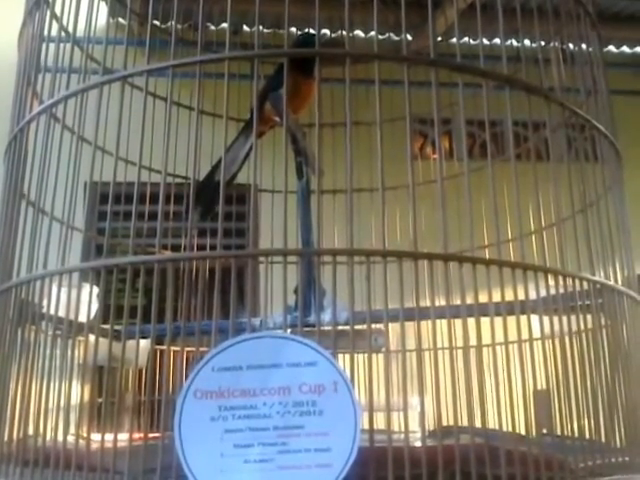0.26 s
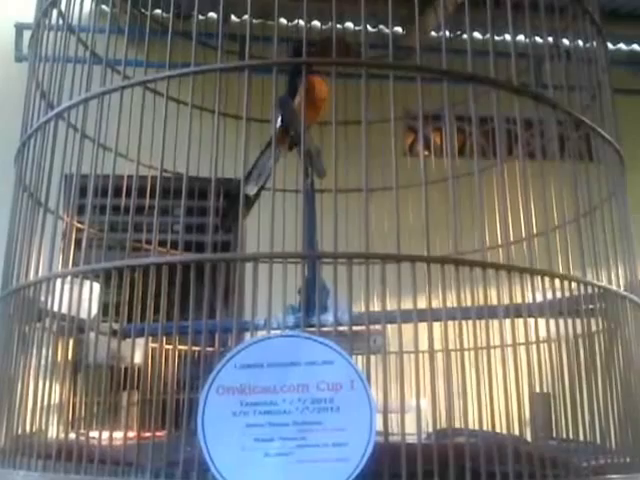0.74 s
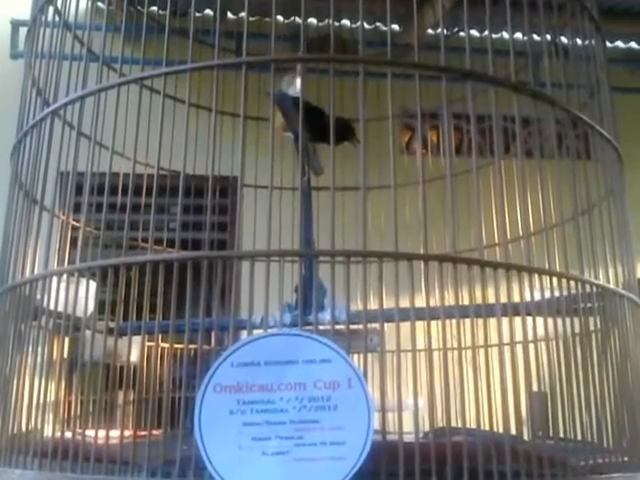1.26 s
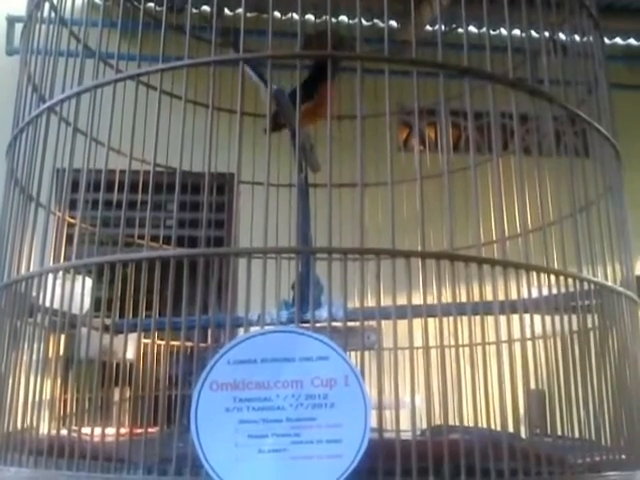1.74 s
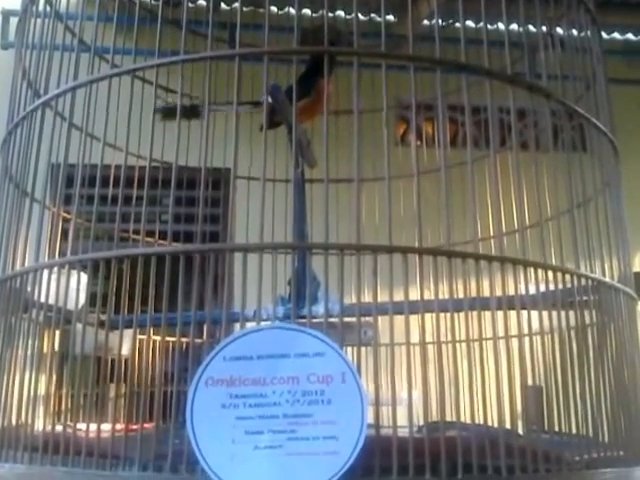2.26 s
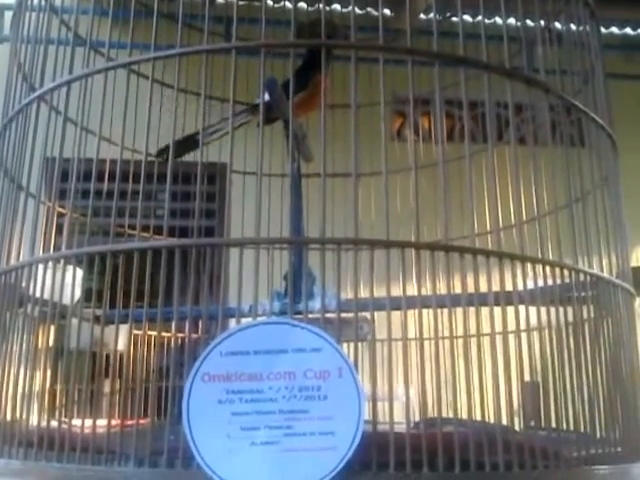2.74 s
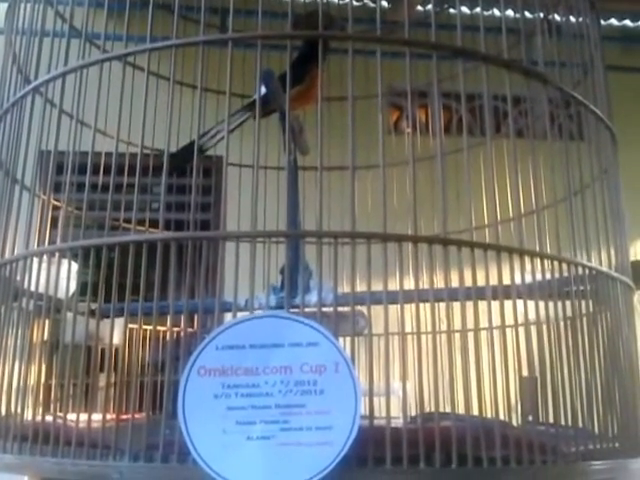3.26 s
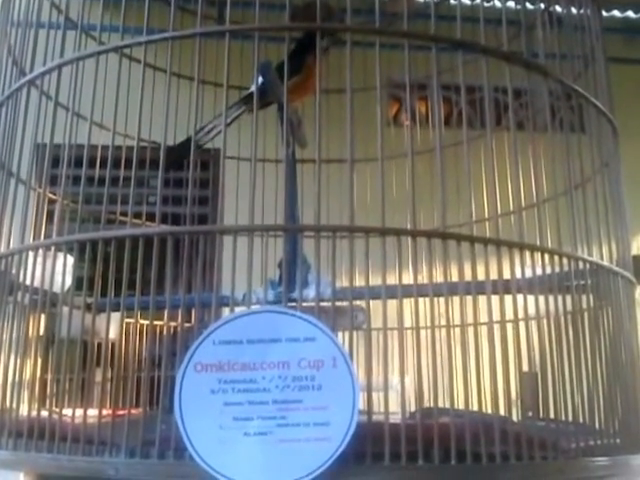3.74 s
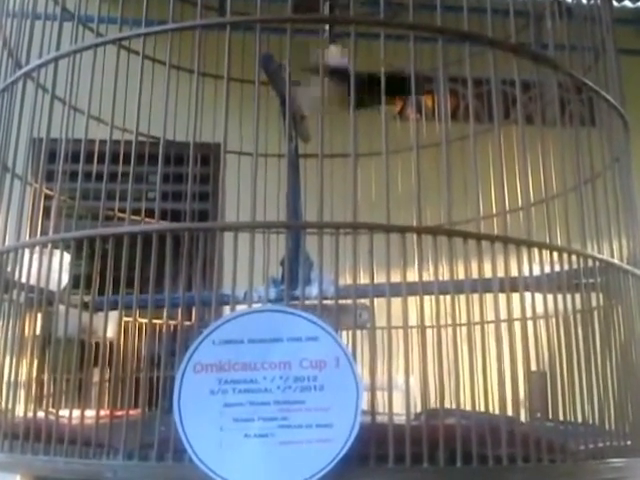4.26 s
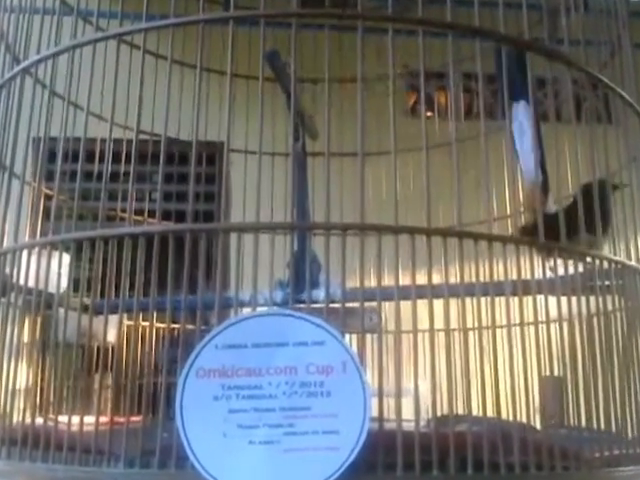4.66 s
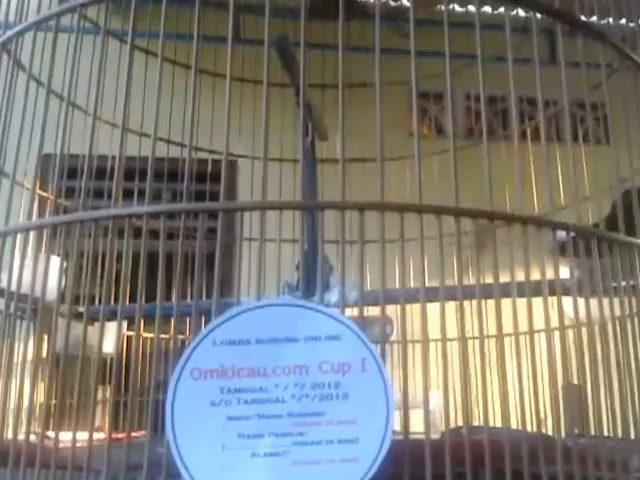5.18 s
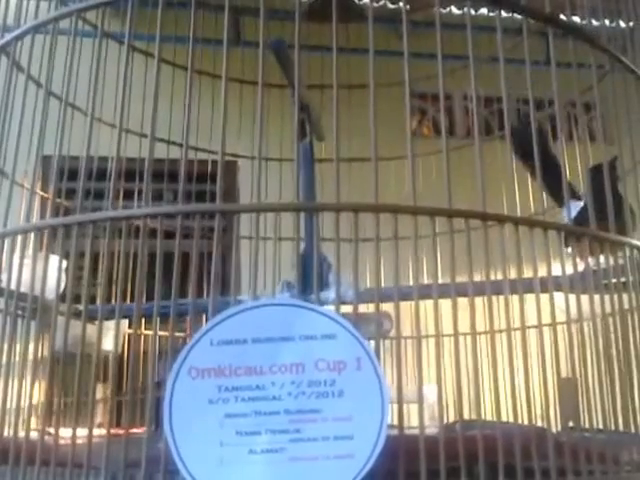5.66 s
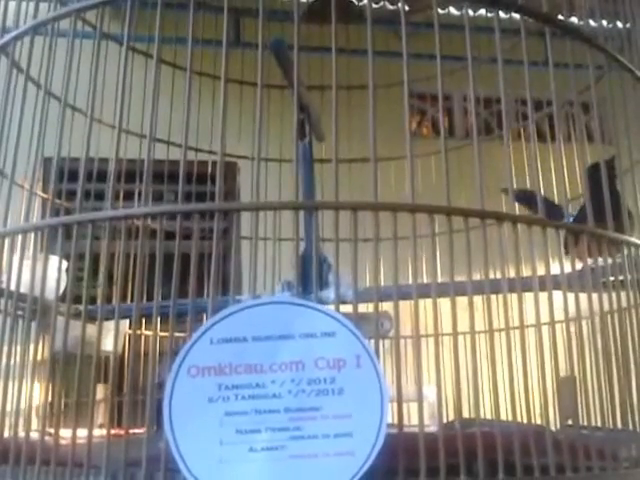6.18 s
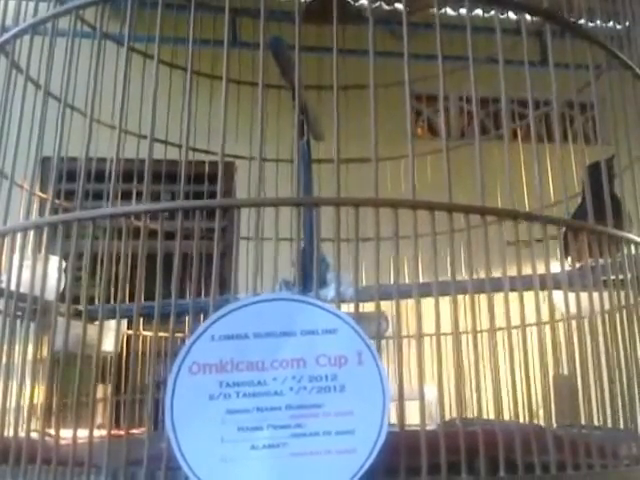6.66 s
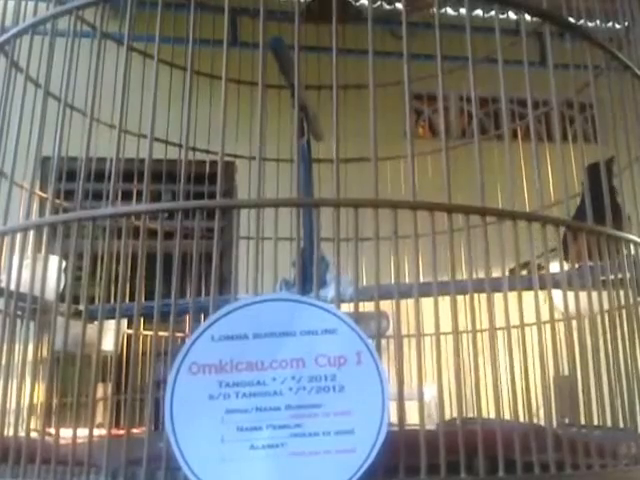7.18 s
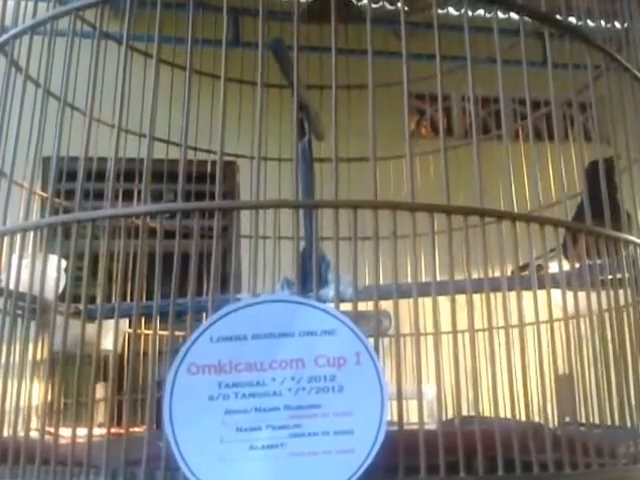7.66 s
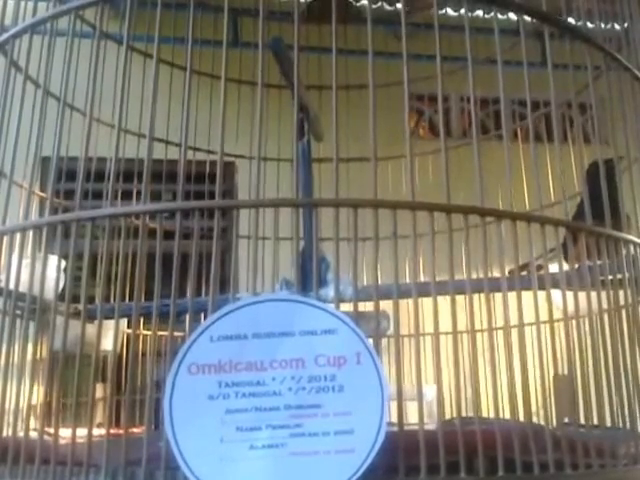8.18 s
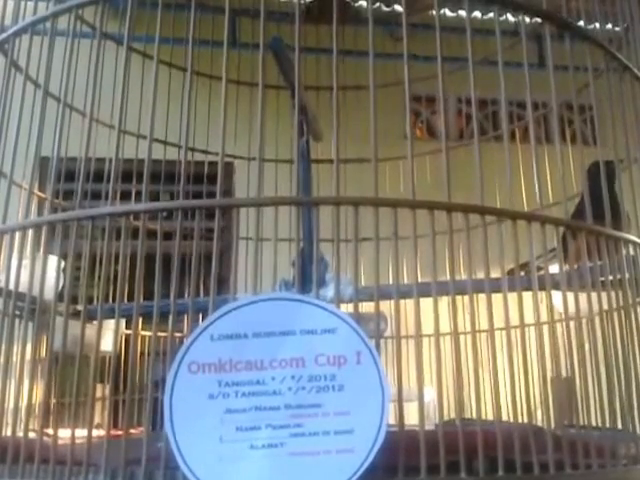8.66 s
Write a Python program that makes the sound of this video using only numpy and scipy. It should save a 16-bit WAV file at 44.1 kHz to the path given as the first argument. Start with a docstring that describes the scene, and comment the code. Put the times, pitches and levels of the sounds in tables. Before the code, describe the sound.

A caged songbird close by sings slurred whistles, quickening upsweeps, harsh chacks and piercing dives on a ringing porch, with a faint engine fading behind.

```python
"""A caged shama sings on a hard-walled porch, close by: gliding oscillators make its slurred whistles,
quickening upsweeps, reedy squeals, piercing dives and harsh chacks, with overtones shaped by the beak.
Random reflections and a decaying diffuse tail make the walls ring. A distant engine hums as a sum of orders
and fades, a far horn sounds once as a few partials, another bird chirps far off,
feathers rustle and the street murmurs as coloured noise."""
import sys
import numpy as np
from scipy import signal
from scipy.fft import rfft, irfft, next_fast_len
from scipy.io import wavfile
from scipy.ndimage import uniform_filter1d, map_coordinates

SR = 44100
rng = np.random.default_rng(int(sys.argv[2]) if len(sys.argv) > 2 else 0)


def file_out(sig):
    """Save sig as 16-bit WAV at sys.argv[1]."""
    # one column per channel
    cols = np.atleast_2d(sig).T
    # limit, then scale
    lim = np.clip(cols, -1, 1)
    pcm = np.round(lim * 32767).astype(np.int16)
    wavfile.write(sys.argv[1], SR, pcm)


N = 393372
TIME = np.arange(N) / SR  # seconds
U = np.linspace(0, 1, 400)  # progress through a note
TOP_HZ = 15750  # upper band limit

# All levels and gains in the tables are relative.
# Overtone strength as throat and beak pass it. Each row: frequency in Hz, gain in dB.
BEAK_RESPONSE = [(1900, -23.5), (2900, -29.5), (3800, -28.5), (5000, -30.5), (6300, -34.5), (7700, -33),
                 (8900, -26), (10100, -19), (11400, -33.5), (13600, -29.5), (15500, -43.5)]
# Decay of the diffuse sound of the porch. Each row: frequency in Hz, time to fall 60 dB in seconds.
PORCH_DECAY = [(1100, 0.29), (1900, 0.38), (4000, 0.33), (8000, 0.26), (15000, 0.22)]
# Distant engine. Each row: time in seconds, firing rate in Hz, level in dB.
ENGINE_COURSE = [(0, 40.86, -22.5), (.5, 40.1, -25), (.8, 37.86, -33.5), (2.6, 35.95, -43.5),
                 (3.2, 29.43, -45.5), (3.7, 32.82, -37.5), (4.15, 34.32, -32.5), (4.5, 32.06, -37),
                 (4.85, 35.2, -31), (5.0, 33.7, -53), (5.3, 32.1, -58), (5.6, 31, -75.5)]
# Resonances of the exhaust. Each row: frequency in Hz, gain in dB.
EXHAUST_RESPONSE = [(30, -46.5), (62, 14.5), (70, 12), (80, -19), (100, 3), (112, 3.5), (123, -2.5),
                    (131, -14), (240, -15.5), (330, -30)]
# Street loudness. Each row: time in seconds, level in dB.
STREET_LEVEL = [(0.15, -52), (0.44, -50), (0.68, -46), (3.24, -49), (5.21, -43), (5.66, -56), (8.76, -55)]
# Low rumble of the street. Each row: frequency in Hz, density in dB per Hz.
RUMBLE_SPECTRUM = [(20, -8.5), (60, 6), (150, -6), (400, -23.5), (1200, -49)]
# Wash of far traffic. Each row: frequency in Hz, density in dB per Hz.
MURMUR_SPECTRUM = [(500, -3), (1000, -9.5), (2000, -13.5), (4000, -13.5), (7000, -31.5), (15000, -52)]
# Partials of the far horn. Each row: frequency in Hz, level in dB.
HORN_PARTIALS = [(565, -42.5), (850, -52), (1420, -69), (1700, -51), (1980, -52), (3100, -51.5),
                 (4250, -52.5)]
# Turbulence in harsh notes. Each row: frequency in Hz, density in dB per Hz.
FIZZ_SPECTRUM = [(1500, -26.5), (3000, 13), (5000, 2.5), (9000, 1.5), (12000, -10), (15000, -22)]
# Ring of the phrase before. Each row: frequency in Hz, density in dB per Hz.
RING_SPECTRUM = [(900, -21.5), (1350, -7), (1950, 5.5), (2250, -50.5)]
# Loudness of the feathers. Each row: time in seconds, level in dB.
WING_LEVEL = [(4.3, -100), (4.45, -66.5), (4.8, -58.5), (5.0, -44.5), (5.28, -44), (5.4, -100)]
# Rustle of the feathers. Each row: frequency in Hz, density in dB per Hz.
WING_SPECTRUM = [(200, -7), (1500, 7.0), (4500, -1), (7000, -25.0), (15000, -31.5)]

# Reedy squeals, each a stack of partials that start nearly together.
# Each row: start in seconds, length in seconds, top pitch in Hz, end pitch in Hz, level in dB.
SQUEAL_PARTIALS = [(0.573, .013, 5204, 4860, -24), (5.347, 0.064, 5100, 4740, -19),
                   (5.351, .06, 8800, 8370, -19), (5.357, 0.046, 6120, 6620, -27),
                   (5.36, 0.045, 4070, 3760, -30), (5.402, 0.03, 3457, 2933, -29.5),
                   (5.56, 0.047, 3073, 2890, -22), (5.557, 0.044, 6280, 5660, -17),
                   (5.561, 0.032, 8870, 7890, -20), (5.738, 0.037, 5320, 4840, -28),
                   (5.728, 0.044, 8540, 6500, -19)]
# Piercing dives. Each row: start in seconds, length in seconds, first and last pitch in Hz, level in dB.
DIVE_NOTES = [(.582, 0.025, 5080, 2570, -3.5), (0.62, 0.027, 4700, 2490, -5),
              (0.655, 0.035, 4200, 2370, -8), (5.412, 0.083, 6810, 2760, -5), (5.608, .055, 5840, 2325, -7),
              (5.787, 0.051, 5660, 2760, -7.5)]
# A hoarse churr of two rough, sinking voices.
# Each row: start in seconds, length in seconds, first and last pitch in Hz, level in dB.
CHURR_VOICES = [(0.823, .105, 4280, 3194, -16), (0.856, 0.16, 6090, 3893, -25)]
# Whistles that ease onto a pitch. Each row: start in seconds, length in seconds,
# first and last pitch in Hz, level in dB, easing, loudest point from 0 to 1.
WHISTLE_NOTES = [ (0.885, .36, 2734, 1976, -24.5, 3.6, 0.96), (0.958, 0.032, 1150, 1183, -37, 0.35, 0.9),
                 (1.363, .355, 2227, 2692, -9.5, 0.98, 0.45), (1.764, 0.14, 1514, 1984, -12, 3, 1),
                 (3.265, 0.069, 2616, 3134, -5.5, 1.8, 0.3), (5.283, 0.03, 1733, 1547, -21, 0.59, 1),
                 (5.905, .04, 1590, 3554, -10, 5.5, .7), (5.941, .085, 2160, 2706, -9.5, 0.38, .72),
                 (6.005, 0.07, 2690, 3523, -4.5, 2.6, 0.8), (6.071, 0.067, 2248, 2627, -17.5, 0.46, 0.4),
                 (6.11, 0.047, 2834, 2889, -8.5, 1.5, 0.4), (6.154, 0.029, 3050, 3644, -10.5, 1.2, 0.2),
                 (6.748, 0.029, 1760, 1714, -48.5, .3, 0.1)]
# Mellow downslurs. Each row: start in seconds, length in seconds, first and last pitch in Hz, level in dB.
DOWNSLUR_NOTES = [(1.973, 0.11, 2213, 1372, -10.5), (2.131, 0.11, 2433, 1371, -11),
                  (2.293, .113, 2513, 1304, -10.5)]
# Scoops that dip, then climb. Each row: start in seconds, length in seconds,
# first, bottom and last pitch in Hz, level in dB, lowest point from 0 to 1.
SCOOP_NOTES = [(2.46, .152, 2620, 1944, 3538, -12.5, 0.13), (2.695, .154, 1983, 1540, 2810, -14, .27),
               (3.38, .152, 2133, 1505, 2742, -15.5, .33), (8.221, 0.075, 2018, 1831, 2343, -13, .38)]
# Upsweeps, in quickening runs. Each row: start in seconds, length in seconds,
# first and last pitch in Hz, level in dB, steepest point from 0 to 1.
UPSWEEP_NOTES = [ (2.908, .11, 1159, 2172, -13.5, 0.37), (3.051, 0.067, 1111, 2257, -13, 0.47),
                 (3.163, 0.054, 1240, 2330, -10.5, 0.29), (3.629, 0.15, 1090, 2337, -13.5, 0.49),
                 (3.841, 0.054, 1092, 2320, -14, 0.35), (3.952, 0.045, 1034, 2300, -12.5, 0.37),
                 (4.044, 0.046, 1030, 2324, -11.5, 0.41), (4.142, 0.036, 1067, 2360, -11, 0.28),
                 (6.896, 0.11, 845, 1937, -6, 0.79), (7.247, 0.094, 787, 2015, -7, 0.62),
                 (7.472, 0.079, 780, 2080, -8, 0.5), (7.622, 0.062, 787, 2056, -8, 0.52),
                 (7.739, 0.045, 886, 2267, -8.5, 0.44), (7.84, 0.028, 1013, 2254, -10.5, 0.11)]
# A reedy rise, rich in overtones. Each row: start in seconds, length in seconds,
# first and last pitch in Hz, level in dB, easing, loudest point from 0 to 1.
REEDY_RISE_NOTES = [(4.242, .095, 1134, 2622, -12.5, 3.2, 0.6)]
# Harsh chacks, the pitch flicking up and back. Each row: start in seconds, length in seconds,
# top pitch in Hz, level in dB, highest point from 0 to 1.
CHACK_NOTES = [(4.318, .045, 4936, -11, .2), (4.358, 0.051, 4870, -17.5, 0.2),
               (4.382, .045, 4785, -11, .65), (6.253, 0.034, 4815, -8, 1), (6.292, 0.053, 5920, -12, 0.7),
               (6.355, 0.032, 5486, -13.5, 0.6), (6.519, 0.047, 5940, -15.5, .55),
               (6.566, 0.055, 5750, -19, 0)]
# Warbled notes. Each row: start in seconds, length in seconds, first and last pitch in Hz,
# level in dB, easing, warble rate in Hz, warble depth as a share of pitch.
WARBLE_NOTES = [(7.867, .085, 2130, 3003, -11, 0.38, 107.7, .055),
                (8.009, .135, 1682, 1322, -20, 9, 40.9, 0.07)]
# A last piercing whistle: soft, then loud, then tipping into a dive.
# Each row: time in seconds, pitch in Hz, level in dB.
PIERCING_WHISTLE = [(8.785, 5050, -38), (8.798, 5420, -24), (8.855, 5600, -23), (8.863, 5660, -9),
                    (8.902, 5760, -9), (8.925, 4100, -10)]

# a note is loudest as its pitch crosses the tuning of the throat
MELLOW_HZ, MELLOW_DB_PER_OCT = 1887, 12.5
HARSH_HZ, HARSH_DB_PER_OCT = 4480, 27.5
SQUEAL_FROM, SQUEAL_TOP = .88, 0.37  # starting pitch over top pitch; point where the top is reached
PLUNGE = .3  # extra fall as a dive gives out, over the steady fall
SCOOP_CURVE = 1.6  # power law of the pitch on either side of the bottom
SCOOP_WARBLE_HZ, SCOOP_WARBLE = 111.45, 0.072  # rate and final depth of the buzz that grows through a scoop
S_CURVE, KNEE_WIDTH = 0.48, .2  # weight of an upsweep's steep middle; width of that middle
CHACK_FOOT_HZ = 2690  # pitch at the foot of a chack's rise and fall
DROPOUT_S, DROPOUT_LENGTH_S, DROPOUT_DB = 5.337, .016, -18
CEILING = .96


def amp(db):
    """Level law: decibels to amplitude gain."""
    return 10 ** (np.asarray(db) / 20)


def unit(x):
    """Normalization: x at rms 1."""
    return x / np.sqrt(np.mean(x ** 2) + 1e-20)


def along(points, hz):
    """Interpolation on a logarithmic frequency axis, through (Hz, value) points."""
    f, v = np.transpose(points)
    return np.interp(np.log(hz + 1), np.log(f), v)


def curves(rows, t=TIME):
    """Linear interpolation in time: each column after the first, read at the times t."""
    s, *cols = np.transpose(rows)
    return [np.interp(t, np.sort(s), c) for c in cols]


def wobble(rate):
    """Slow random modulation: a smooth curve through random knots, rate of them a second."""
    knots = rng.standard_normal(int(N * rate / SR) + 4)
    return map_coordinates(knots, [TIME * rate])


def filtered(x, response):
    """Linear filtering: the spectrum of x times a response of frequency."""
    m = next_fast_len(N + SR // 2)
    spectrum = rfft(x, m) * response(np.fft.rfftfreq(m, 1 / SR))
    return irfft(spectrum, m)[:N]


def noise(spectrum):
    """Spectral shaping: coloured noise of rms 1."""
    white = rng.standard_normal(N)
    return unit(filtered(white, lambda hz: amp(along(spectrum, hz))))


def lingering_ring(t60=0.41):
    """Exponential decay: the porch still rings from the phrase before."""
    return amp(-23 - 60 * TIME / t60) * noise(RING_SPECTRUM)


def engine(count=10):
    """Harmonic orders through resonances: a far engine slows and picks up again behind its exhaust."""
    hz, db = curves(ENGINE_COURSE)
    phase = 2 * np.pi * np.cumsum(hz * (1 + 0.017 * wobble(13))) / SR
    orders = sum(amp(along(EXHAUST_RESPONSE, k * hz)) * np.sin(k * phase) for k in range(1, count + 1))
    return amp(db - 3.0 + 0.5 * wobble(6.9)) * orders


def street():
    """Broadband noise: an unsteady low rumble and a soft wash of far traffic."""
    db, = curves(STREET_LEVEL)
    rumble = amp(db + 11 + wobble(5.2)) * noise(RUMBLE_SPECTRUM)
    murmur = amp(db + 1.5) * noise(MURMUR_SPECTRUM)
    return rumble + murmur


def syrinx(notes, jitter, jitter_rate, flutter_db, slope_db, flicker_db=4, edge=0.0019, count=9):
    """Self-oscillation: a gliding membrane gives a fundamental, its overtones and its unsteady amplitude."""
    tone, overtones, strain = np.zeros((3, N))
    waver, flutter = wobble(jitter_rate), wobble(jitter_rate)
    for points in notes:
        start, end = points[0][0], points[-1][0]
        span = slice(max(0, int((start - edge) * SR)), int((end + edge) * SR))
        t = TIME[span]
        hz, db = curves(points, t)
        # the faster the glide (octaves a second), the less steady the membrane
        glide = uniform_filter1d(np.abs(np.gradient(np.log2(hz), t)), size=900)
        rough = np.clip(glide / 10, .65, 1)
        hz = hz * (1 + jitter * rough * waver[span])
        phase = 2 * np.pi * np.cumsum(hz) / SR
        from_edge = np.minimum(t - start, end - t) + edge
        gate = np.sin(np.pi / 2 * np.clip(from_edge / (2 * edge), 0, 1)) ** 2
        size = gate * amp(db + flutter_db * flutter[span])
        strain[span] += size * rough
        tone[span] += size * np.sin(phase)
        flicker = rng.standard_normal((count + 1, 64))
        # overtones grow with effort, flicker and sweep across the resonances of the beak
        for k in range(2, count + 1):
            uneven = flicker_db * np.interp((t - start) * 110, np.arange(flicker.shape[1]), flicker[k])
            effort = .3 * (db + 12)
            gain_db = along(BEAK_RESPONSE, k * hz) - slope_db * np.log2(k / 2) + effort + uneven
            overtones[span] += (k * hz < TOP_HZ) * size * amp(gain_db) * np.sin(k * phase)
    return tone, overtones, strain


def far_chirps(starts=(.275, .375, .475)):
    """A pure gliding tone: another bird, far off, repeats one small rising chirp."""
    chirps = [[(s, 3300, -56), (s + .015, 3720, -49), (s + .05, 3950, -56)] for s in starts]
    return syrinx(chirps, jitter=.01, jitter_rate=500, flutter_db=1, slope_db=10, count=1)[0]


def porch(x, early_db, early_time, tail_db, count=24):
    """Reverberation: distinct wall reflections, then a diffuse tail; the paths change as the bird turns."""
    out, step = np.zeros(N + 2 * SR), SR // 4
    # overlapping windows, each with new random reflections
    for first in range(-step, N, step):
        hz, t, z = signal.stft(rng.standard_normal(SR // 2), SR, nperseg=256)
        decay = amp(-60 * t / along(PORCH_DECAY, hz)[:, None])
        tail = signal.istft(z * decay, SR, nperseg=256)[1]
        tail *= 1 - np.exp(-TIME[:len(tail)] / 0.0084)  # diffuse sound takes time to build
        delay = .002 + early_time * (np.arange(count) + rng.random(count)) / count  # seconds
        strength = rng.choice([-1, 1], count) * np.exp(-delay / early_time)
        walls = np.bincount((delay * SR).astype(int), strength, len(tail))
        early = amp(early_db) * walls / np.linalg.norm(walls)
        answer = early + amp(tail_db) * tail / np.linalg.norm(tail)
        at = np.arange(max(first, 0), min(first + 2 * step, N))
        window = np.sin(np.pi * (at - first) / (2 * step))
        echo = signal.fftconvolve(x[at] * window, answer)
        out[at[0]:at[0] + len(echo)] += echo
    return out[:N]


def note(start, length, hz, db):
    """Trajectory of one note: points of time in seconds, pitch in Hz and level in dB."""
    return np.column_stack([start + length * U, hz, db])


def sing(*kinds):
    """Superposition: all the notes of (rule, table) pairs."""
    return [rule(*row) for rule, table in kinds for row in table]


def bend(from_hz, to_hz, path):
    """Logarithmic glide: pitch travels between two values along a monotonic path of any scale."""
    return from_hz * (to_hz / from_hz) ** ((path - path[0]) / (path[-1] - path[0]))


def away(point):
    """Normalized distance from a point of the note: 0 there, 1 at both ends."""
    point = np.clip(point, .05, .95)
    return np.maximum((point - U) / point, (U - point) / (1 - point))


def swell(crest, onset_db, release_db):
    """Amplitude envelope: effort in dB grows to its crest, then lets go."""
    return -np.where(U < crest, onset_db, release_db) * away(crest) ** 2


def fade(release_db):
    """Amplitude envelope: effort in dB is full from the start and drops late."""
    return -release_db * U ** 4


def tremble(length, rate_hz, depth):
    """Frequency modulation: pitch factor of a fast, regular warble."""
    return 1 + depth * np.sin(2 * np.pi * rate_hz * length * U)


def throat(hz, tuned_hz, db_per_oct):
    """Resonance: loss in dB as the pitch leaves the tuning of the throat."""
    return -db_per_oct * np.abs(np.log2(hz / tuned_hz))


def squeal(start, length, top_hz, to_hz, db, onset_db=8):
    """Rise and relaxation: a partial climbs quickly to its top and sags while the effort builds."""
    ratio = np.where(U < SQUEAL_TOP, SQUEAL_FROM, to_hz / top_hz)
    hz = top_hz * ratio ** (away(SQUEAL_TOP) ** 1.4)
    return note(start, length, hz, db - onset_db * (1 - U) ** 3)


def dive(start, length, from_hz, to_hz, db):
    """Falling chirp: a steady, steep descent, loudest early on, that plunges as it dies."""
    hz = bend(from_hz, to_hz, U + PLUNGE * U ** 12)
    return note(start, length, hz, db + swell(0.37, onset_db=11, release_db=18.5))


def whistle(start, length, from_hz, to_hz, db, easing, crest):
    """Exponential settling: the pitch eases in while the note swells and fades."""
    hz = bend(from_hz, to_hz, -np.exp(-easing * U))
    return note(start, length, hz, db + swell(crest, onset_db=19.5, release_db=16))


def downslur(start, length, from_hz, to_hz, db, easing=1.3):
    """Glide across a resonance: a slowing fall through the tuning of the throat."""
    hz = bend(from_hz, to_hz, -np.exp(-easing * U))
    effort = swell(0.27, onset_db=16.5, release_db=10)
    return note(start, length, hz, db + throat(hz, MELLOW_HZ, MELLOW_DB_PER_OCT) + effort)


def scoop(start, length, from_hz, bottom_hz, to_hz, db, turn, onset_db=13, attack_s=0.0071):
    """Growing frequency modulation: a short dip fades in, then a long climb turns buzzy."""
    outer_hz = np.where(U < turn, from_hz, to_hz)
    hz = bottom_hz * (outer_hz / bottom_hz) ** (away(turn) ** SCOOP_CURVE)
    hz = hz * tremble(length, SCOOP_WARBLE_HZ, SCOOP_WARBLE * U ** 2)
    attack = -onset_db * np.exp(-length * U / attack_s)
    return note(start, length, hz, db + swell(1.0, onset_db=0.5, release_db=12.5) + attack)


def upsweep(start, length, from_hz, to_hz, db, knee):
    """Glide across a resonance: an S-shaped rise through the tuning of the throat."""
    steep = np.tanh((U - knee) / KNEE_WIDTH) / 2
    hz = bend(from_hz, to_hz, (1 - S_CURVE) * U + S_CURVE * steep)
    effort = swell(0.39, onset_db=14.5, release_db=0.0)
    return note(start, length, hz, db + throat(hz, MELLOW_HZ, MELLOW_DB_PER_OCT) + effort)


def chack(start, length, top_hz, db, turn):
    """Sharp resonance: the pitch flicks up and back across a tight throat before the note is choked off."""
    hz = top_hz * (CHACK_FOOT_HZ / top_hz) ** (away(turn) ** 1.3)
    return note(start, length, hz, db + throat(hz, HARSH_HZ, HARSH_DB_PER_OCT) + fade(release_db=17))


def warble(start, length, from_hz, to_hz, db, easing, rate_hz, depth):
    """Frequency modulation: an easing whistle at nearly even effort, its pitch shaking."""
    hz = bend(from_hz, to_hz, -np.exp(-easing * U)) * tremble(length, rate_hz, depth)
    return note(start, length, hz, db + fade(release_db=6.5))


def shama():
    """Regular and irregular oscillation: near-pure whistles, harsh flapping notes; returns tones and treble."""
    slurs = sing((upsweep, UPSWEEP_NOTES), (downslur, DOWNSLUR_NOTES), (warble, WARBLE_NOTES),
                 (scoop, SCOOP_NOTES), (dive, DIVE_NOTES))
    swept = syrinx(slurs, jitter=.007, jitter_rate=380, flutter_db=2.2, slope_db=6.5, flicker_db=5.5, count=10)
    whistles = sing((whistle, WHISTLE_NOTES)) + [PIERCING_WHISTLE]
    held = syrinx(whistles, jitter=.01, jitter_rate=380, flutter_db=2.2, slope_db=9, flicker_db=6.5, count=6)
    pure, sheen, pure_strain = np.add(swept, held)

    reedy = sing((squeal, SQUEAL_PARTIALS), (whistle, REEDY_RISE_NOTES))
    reed, twang, _ = syrinx(reedy, jitter=.03, jitter_rate=800, flutter_db=2.5, slope_db=4)

    chacks = syrinx(sing((chack, CHACK_NOTES)), jitter=.03, jitter_rate=450, flutter_db=2.5, slope_db=5)
    churr = syrinx(sing((dive, CHURR_VOICES)), jitter=.12, jitter_rate=900, flutter_db=4, slope_db=5)
    harsh, buzz, harsh_strain = np.add(chacks, churr)

    # fast slurs stir the air in the beak; in the harsh notes that turbulence sputters
    air = amp(-34.5) * pure_strain * noise(BEAK_RESPONSE)
    fizz = harsh_strain ** .75 * amp(4 * wobble(300)) * noise(FIZZ_SPECTRUM)
    tones = amp(0.5) * pure + reed + harsh
    treble = amp(-0.7) * sheen + air + amp(15.5) * twang + amp(7.5) * buzz + amp(-13) * fizz
    return tones, treble


def wings():
    """Friction noise: feathers rustle softly as the bird crosses the cage and settles on the bars."""
    db, = curves(WING_LEVEL)
    return amp(db + 1.8 * wobble(36)) * noise(WING_SPECTRUM)


def horn(start=4.965, end=5.28):
    """Additive partials: a far horn sounds once, wavering in level and phase on its way."""
    gate = np.clip(np.minimum(TIME - start, end - TIME) / 0.0074, 0, 1)
    blast = np.zeros(N)
    for hz, db in HORN_PARTIALS:
        level = amp(db + 1.55 * wobble(21))
        blast += level * np.sin(2 * np.pi * hz * TIME + 0.39 * wobble(45))
    return gate * blast


def scene():
    """Superposition of direct and reflected sound: the bird on its porch, with the street behind."""
    tones, bright = shama()
    tones = tones + far_chirps()
    song = tones + porch(tones, early_db=-3, early_time=.025, tail_db=-8)
    # the treble is beamed away from the listener, so most of it arrives by the walls
    treble = amp(-2) * bright + porch(bright, early_db=-1, early_time=0.018, tail_db=-7)
    return (song + treble + wings() + lingering_ring() + engine() + horn() + street())[None]


def record(dry):
    """Saturation and band limiting: the level dips once, high peaks are rounded, the top band is removed."""
    dip_db = DROPOUT_DB * np.exp(-(2 * (TIME - DROPOUT_S) / DROPOUT_LENGTH_S) ** 4)
    x = dry[0] * amp(dip_db)
    rounded = x / (1 + np.abs(x / CEILING) ** 8) ** (1 / 8)
    return filtered(rounded, lambda hz: hz < TOP_HZ)[None]


dry = scene()
out = record(dry)
file_out(out)
```